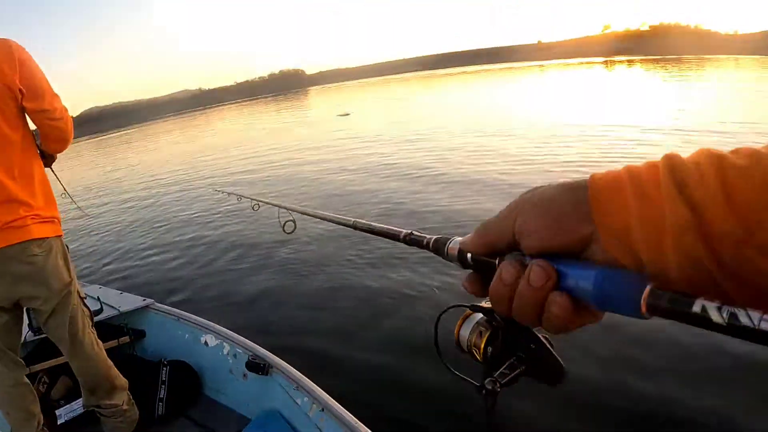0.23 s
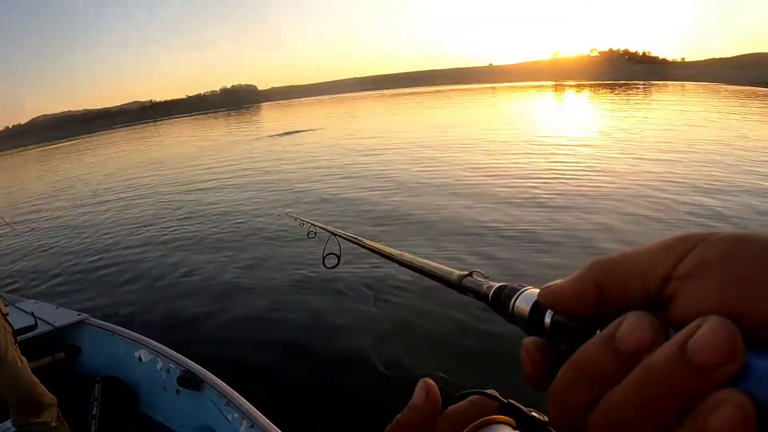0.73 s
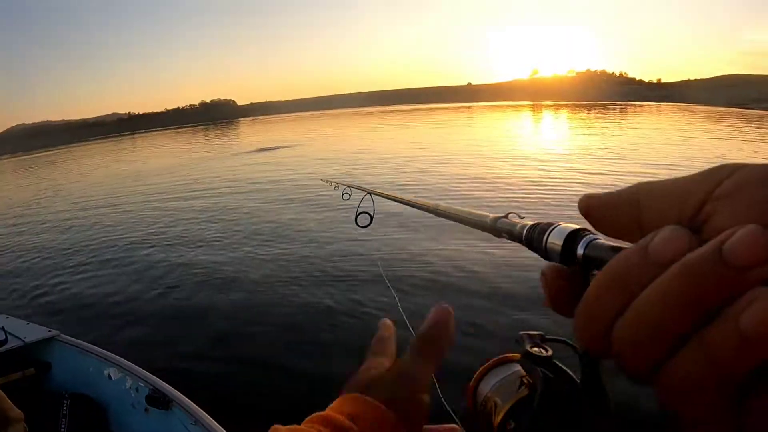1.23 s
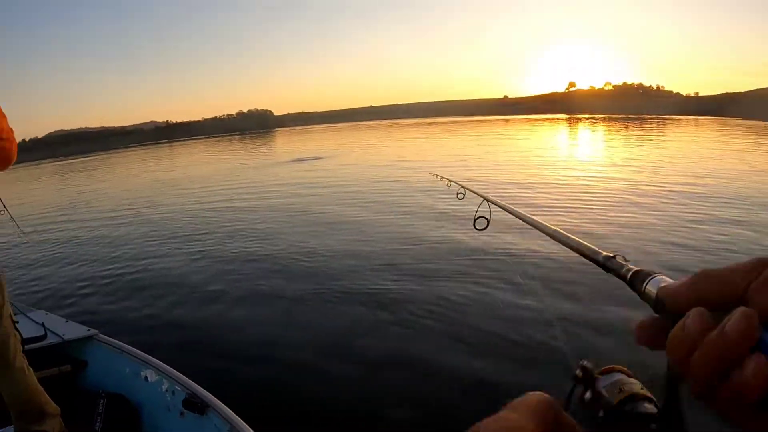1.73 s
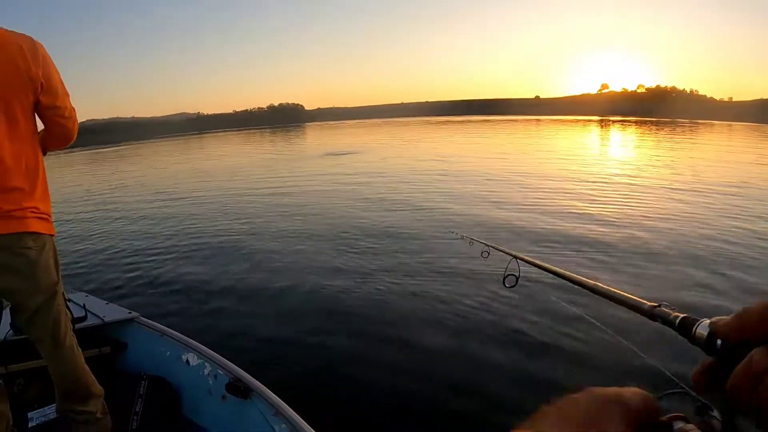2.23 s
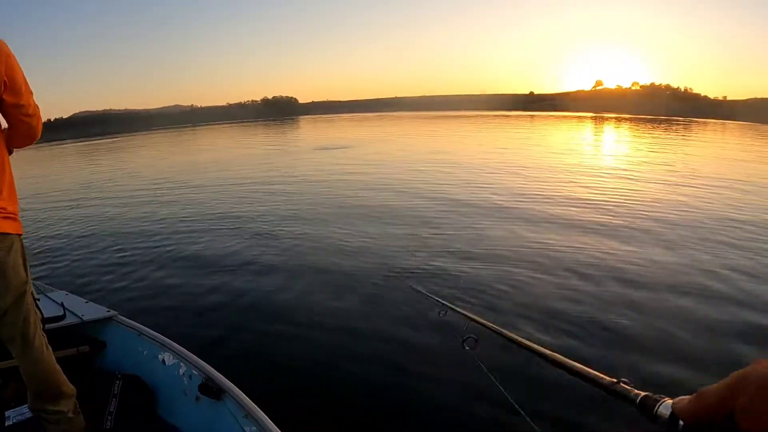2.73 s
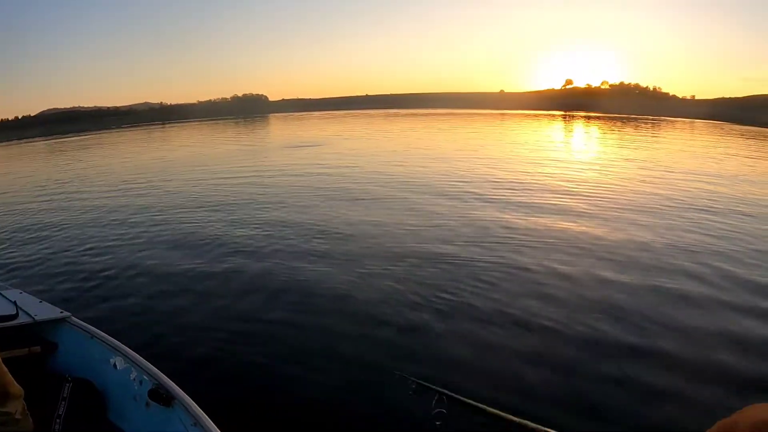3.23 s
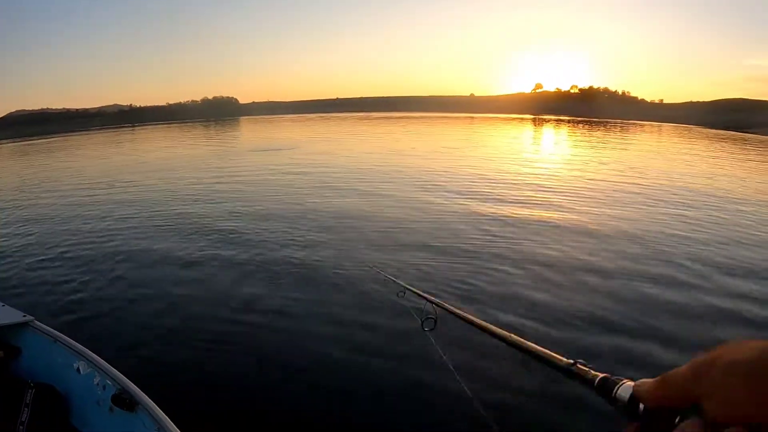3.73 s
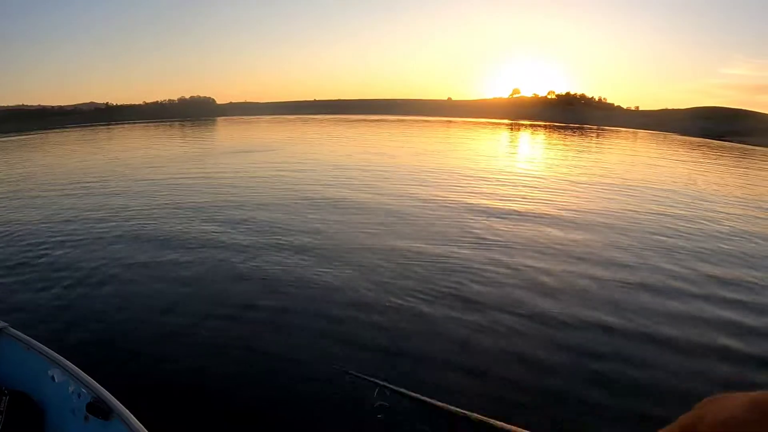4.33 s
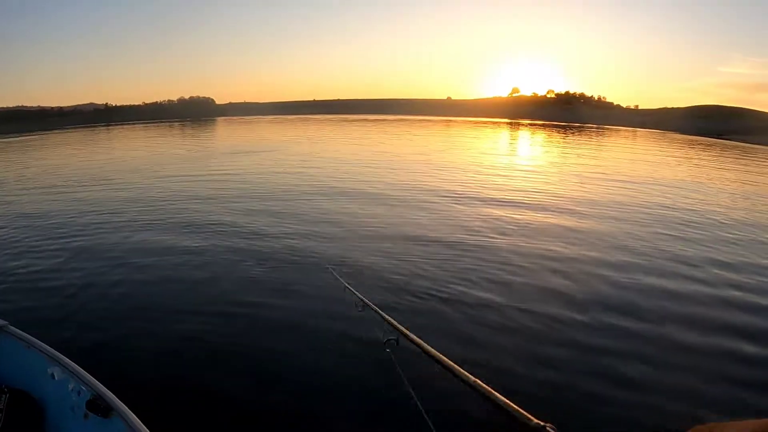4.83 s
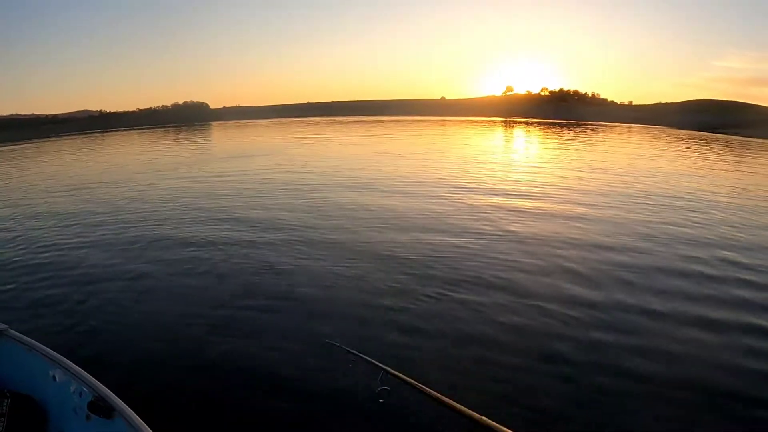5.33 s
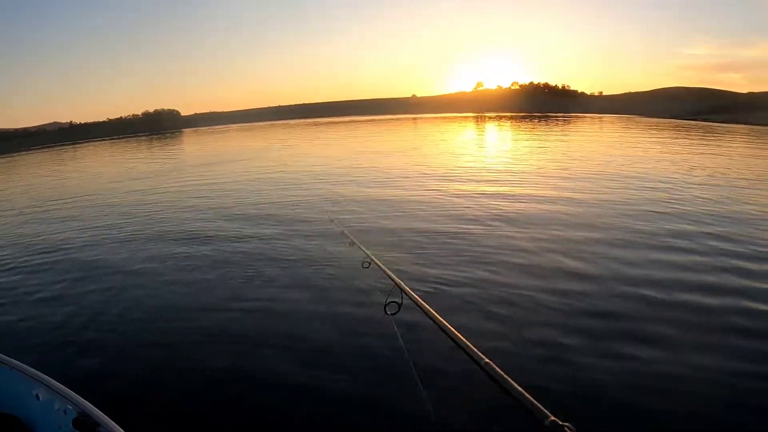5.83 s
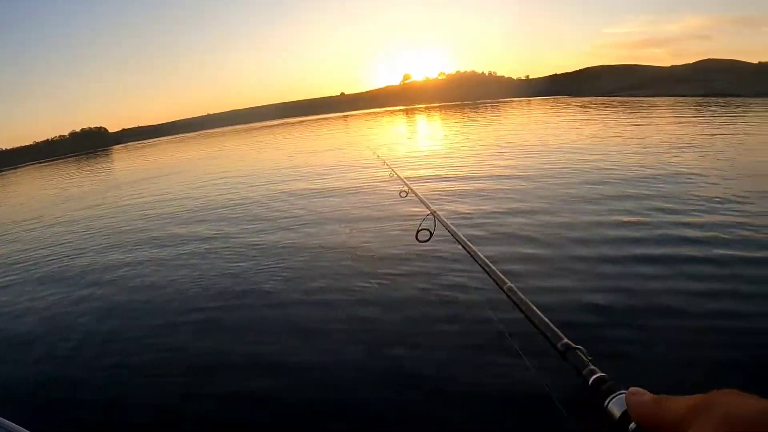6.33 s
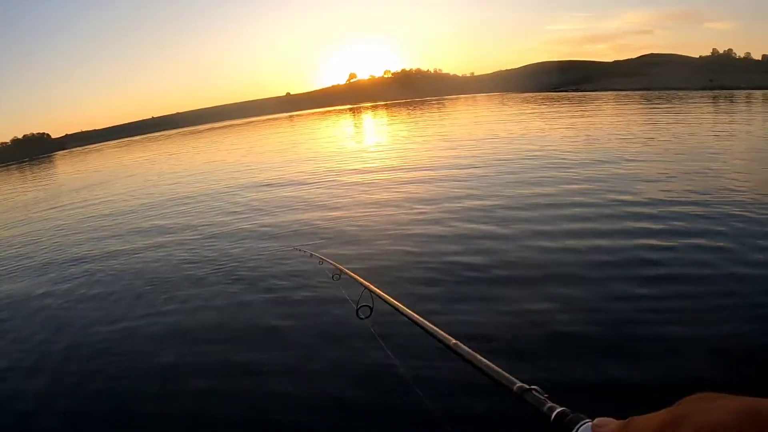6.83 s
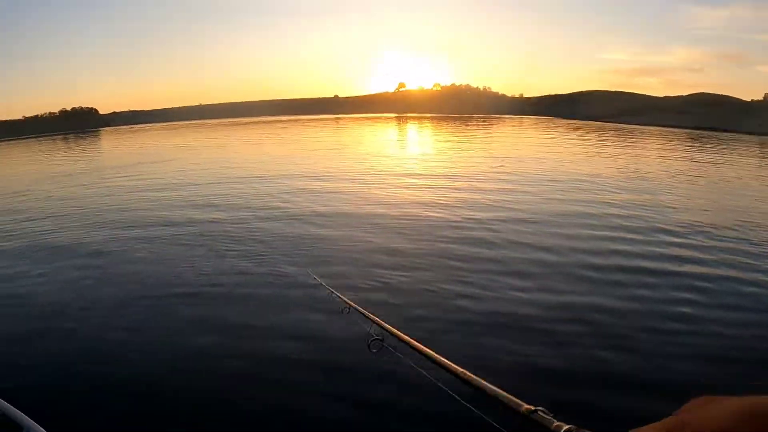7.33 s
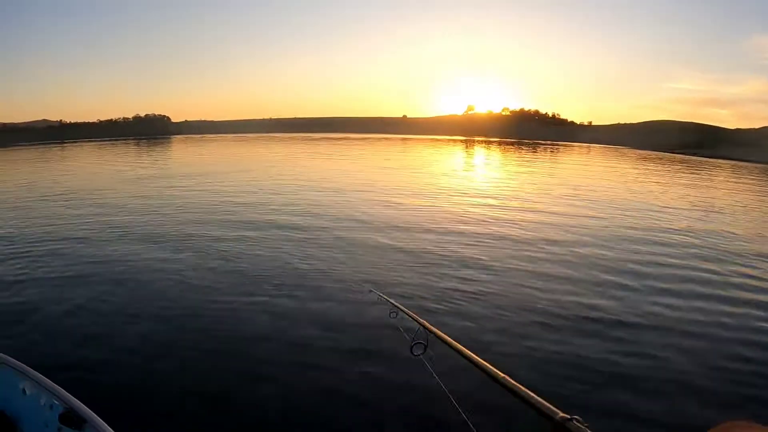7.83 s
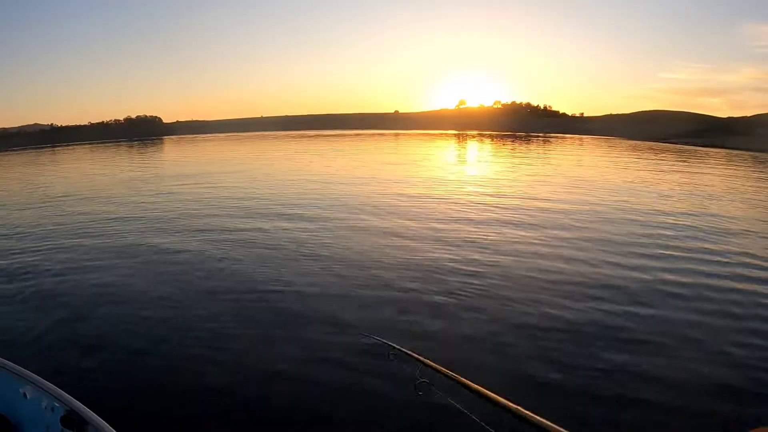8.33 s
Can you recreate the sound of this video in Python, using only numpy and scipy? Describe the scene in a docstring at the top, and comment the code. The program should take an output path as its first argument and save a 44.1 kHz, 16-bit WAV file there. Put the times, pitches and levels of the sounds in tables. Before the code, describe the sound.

Quiet open air on a lake, heard from a microphone on an angler's chest in a small metal boat. From 0 to 1.1 s a sleeve rustles, gear knocks softly, and line runs off a spinning reel with a fluttering hiss and thin high singing, swelling around 0.7 to 0.95 s. At 1.15 s the bail slams shut, a tight cluster of loud, bright metallic cracks with a brief ring. From about 1.5 s the reel is wound in uneven fits: faint gear whirr, line rubbing, crackles and sharp ticks. A low hollow hull thump hits at 2.4 s with rattling knocks. Water gulps softly at times, mostly from 3.6 to 4.8 s. Ticks crowd together at 4.8 to 5 s, then thin out. Deep soft bumps come from 5.9 to 7.1 s, another click cluster around 7.2 to 7.5 s, and a faint grip squeak with small knocks at 8.5 s.

```python
"""An angler in a small metal boat on a calm lake, with a camera on the chest.
From the start, still air, a rustling sleeve and soft knocks; line hisses and sings off a spinning reel.
At 1.15 s the bail snaps shut: hard cracks with the ring of the reel. Water gulps softly under the hull.
From 1.47 s the reel is wound in fits: gears ring resonances, line ticks, rubs and crackles as grains of noise.
Blows ring the hull's low modes, the strongest at 2.4 s; near the end the grip squeaks, a narrow noise band."""
import sys
import numpy as np
from scipy import signal
from scipy.fft import rfft, irfft, next_fast_len
from scipy.io import wavfile
from scipy.ndimage import uniform_filter1d

SR = 44100
rng = np.random.default_rng(int(sys.argv[2]) if len(sys.argv) > 2 else 0)


def inscribe(sig):
    """Save sig as 16-bit PCM at rate SR to the path in sys.argv[1].

    A 1-D sig is mono; a 2-D sig holds one channel per row.
    Samples are clipped to [-1, 1] before scaling.
    """
    pcm = np.round(np.clip(np.atleast_2d(sig).T, -1, 1) * 32767)
    wavfile.write(sys.argv[1], SR, pcm.astype(np.int16))


N = 378378
TIME = np.arange(N) / SR
HIT = np.arange(SR // 2) / SR  # half a second, for one blow
LEFT_RIGHT = np.array([[1], [-1]])


def undb(db):
    """Decibels to gain."""
    return 10 ** (np.asarray(db) / 20)


def unit(x):
    """Scale to rms 1."""
    return x / np.sqrt(np.mean(x ** 2))


def peak(x, db):
    """Scale to a peak level."""
    return x * undb(db) / np.abs(x).max()


def level(x, db, window_s):
    """Scale to the rms level of the loudest moment."""
    power = uniform_filter1d(np.mean(np.atleast_2d(x) ** 2, axis=0), max(int(window_s * SR), 1))
    return x * undb(db) / np.sqrt(power.max())


def fade(t60):
    """Exponential decay of one blow."""
    return np.exp(-np.log(1000) * HIT / max(t60, 1e-4))


def arch(start, length):
    """A smooth swell from silence and back."""
    return np.sin(np.pi * np.clip((TIME - start) / length, 0, 1))


def curve(table, column=1):
    """Gain over time from a dB column, dying away quickly outside its span."""
    rows = np.array(table)
    outside_s = np.maximum(rows[0, 0] - TIME, 0) + np.maximum(TIME - rows[-1, 0], 0)
    return undb(np.interp(TIME, rows[:, 0], rows[:, column])) * np.exp(-outside_s / 0.043)


def colour(x, points):
    """Causal minimum-phase filter with a (Hz, dB) response, built by folding the cepstrum."""
    size = next_fast_len(x.shape[-1] + 2048) // 2 * 2
    hz, db = np.transpose(points)
    bins_hz = np.maximum(np.arange(size // 2 + 1) * SR / size, 1)
    gain = undb(np.interp(np.log(bins_hz), np.log(hz), db))
    cepstrum = irfft(np.log(gain))
    cepstrum[1:size // 2] *= 2
    cepstrum[size // 2 + 1:] = 0
    return irfft(rfft(x, size) * np.exp(rfft(cepstrum)))[..., :x.shape[-1]]


def ring(x, hz, width):
    """One resonance, gain 1 at its centre."""
    hz = min(hz, SR * .45)
    g, k = np.tan(np.pi * hz / SR), width / hz
    numerator = [g * k, 0, -g * k]
    denominator = [1 + g * k + g * g, 2 * g * g - 2, 1 - g * k + g * g]
    return signal.lfilter(numerator, denominator, x + 1e-18)


def noise(side_db, size=N):
    """Stereo noise: a shared part and a part of opposite sign at the two ports."""
    mid, side = rng.standard_normal((2, size))
    return mid + undb(side_db) * side * LEFT_RIGHT


def walk(rate):
    """Random levels held 1 / rate s and slewed; spread near 1."""
    k = max(int(SR / rate), 2)
    steps = np.repeat(rng.standard_normal(N // k + 1), k)
    return unit(uniform_filter1d(steps, k)[:N])


def narrow(hz, width):
    """A band of noise whose centre follows a pitch curve; rms 1."""
    lowpass = signal.butter(2, width / 2, fs=SR, output="sos")
    churn = signal.sosfilt(lowpass, rng.standard_normal((2, len(hz))))
    phase = 2 * np.pi * np.cumsum(hz) / SR
    return unit(churn[0] * np.cos(phase) + churn[1] * np.sin(phase))


def scatter(t60):
    """One hard contact spreading through a small body: a dense, dying burst with a fairly even spectrum."""
    spectrum = rfft(rng.standard_normal(len(HIT)) * fade(t60))
    return irfft(spectrum / (np.abs(spectrum) + 1e-12), len(HIT)) * fade(t60 * 2)


def grains(rate, spread_db, side_db):
    """A crowd of tiny contacts at random moments, most weak and a few strong; rms 1."""
    sizes = undb(spread_db * np.minimum(rng.exponential(size=N), 4))
    return unit((rng.random(N) < rate / SR) * sizes * noise(side_db))


def add(track, s, sound):
    """Mix a sound in at a time."""
    i = int(s * SR)
    track[..., i:i + sound.shape[-1]] += sound[..., :N - i]


# Still air over the lake. Each row: frequency in Hz, relative density in dB per Hz.
AIR_COLOUR = [(25, -6.5), (90, -3.5), (160, 6.5), (300, 1), (500, -5.5), (900, -13), (1300, -8),
              (2200, -18), (4000, -28), (7700, -21), (8700, -38), (12300, -38), (13800, -53),
              (16000, -62.5)]
AIR_DB = -57.5
# The camera sways on the chest. Each row: time in seconds, relative level in dB.
SWAY_LEVELS = [(0, -69), (.45, -52), (.65, -52.5), (.9, -59), (1.3, -62), (2.3, -59), (2.5, -36.5),
               (2.75, -49.5), (3.2, -60), (4.6, -56.5), (4.85, -74), (5.2, -51.5), (6.2, -52.5), (7.2, -48),
               (7.32, -72), (7.85, -58), (8.0, -61), (8.58, -57)]


def background(sway_db=-4, sway_hz=34, sway_width_hz=55, lurch_db=3):
    """Quiet open air, and the low rumble of the camera swaying and lurching."""
    air = undb(AIR_DB) * unit(colour(noise(side_db=-11.0), AIR_COLOUR)) * undb(0.14 * walk(1.97))
    sway = ring(noise(side_db=-16.5), sway_hz, sway_width_hz)
    sway = ring(sway, sway_hz, sway_width_hz)
    return air + undb(sway_db) * unit(sway) * curve(SWAY_LEVELS) * undb(lurch_db * walk(12))


# Line running off the spool. Each row: time in seconds, relative level in dB,
# coils brushing the lip in dB relative to that.
CAST_RUN = [(0.0, -42.5, -25), (0.04, -45.5, -12.5), (0.326, -48.5, -14.5), (0.346, -50, -9.5),
            (0.598, -49.5, -4.5), (0.648, -48.5, -8), (0.7, -41.5, -15), (0.76, -42, -15), (0.94, -44, -14),
            (0.98, -48, -7), (1.016, -48.5, -14), (1.05, -51.5, -15), (1.11, -49, -26)]
# The hand round the spool colours the hiss. Each row: frequency in Hz, relative density in dB per Hz.
CAST_HISS_COLOUR = [(70, -8), (170, 3), (450, -1), (900, -7.5), (1400, -6), (1950, -6.5), (3000, -8.5),
                    (4800, -12), (7600, -15.5), (8600, -19.5), (14000, -30)]
# Its resonances. Each row: frequency in Hz, width in Hz, relative level in dB.
CAST_RESONANCES = [(988, 53, -1), (1185, 45, -6), (2703, 48, 1), (2783, 40, -4), (3150, 36, -3),
                   (3870, 53, -6.5), (4500, 90, -20)]
# Brushing of the coils. Each row: frequency in Hz, relative density in dB per Hz.
COIL_BRUSH_COLOUR = [(3000, -36), (7000, 3), (9000, -2), (10300, 3.5), (11200, 7.5), (12300, 8), (13200, 2),
                     (16000, -22)]
# The spool's lip sings, starting sharp by the drop and settling.
SING_HZ, SING_DROP_HZ, SING_SETTLE_S = 2780, 227.4, 0.11
RING_COUPLING = .8  # exponent: ringing against strength of the run


def cast(modes_db=-3.0, flutter_db=1.5, shift_db=3.5, level_db=-2, brush_db=3, sing_db=-14,
         sing_width_hz=34):
    """Coils whip off: a fluttering hiss, ringing more the harder it runs, a settling note, fine brushing."""
    run = curve(CAST_RUN)
    rush = noise(side_db=-10.5) * undb(flutter_db * walk(70.6))
    rings = sum(undb(db + shift_db * walk(24.3)) * ring(rush, hz, width)
                for hz, width, db in CAST_RESONANCES)
    note = narrow(SING_HZ + SING_DROP_HZ * np.exp(-TIME / SING_SETTLE_S), sing_width_hz)
    ringing = undb(modes_db) * unit(rings) + undb(sing_db) * note
    body = unit(colour(rush, CAST_HISS_COLOUR)) + ringing * (run / run.max()) ** RING_COUPLING
    brush = unit(colour(noise(side_db=-6.0), COIL_BRUSH_COLOUR)) * curve(CAST_RUN, column=2)
    return undb(level_db) * (body + undb(brush_db) * brush) * run


# Colour of the sleeve. Each row: frequency in Hz, relative level in dB.
CLOTH_COLOUR = [(70, -17), (160, 0.5), (280, 1), (500, -0.5), (660, 1), (800, -3.5), (970, 0), (1500, -8.5),
                (2500, -11), (4000, -36), (9000, -55)]
# The arm swings the rod down after the cast. Each row: time in seconds, relative level in dB.
ARM_SWING = [(0, -47), (.05, -63), (.12, -53), (.18, -56), (.24, -49), (.36, -50), (.5, -52), (.75, -51),
             (1.05, -59.5)]


def sleeve(level_db=1.5, catch_db=2.5, fold_db=1.5, snag_rate=180, snag_db=0):
    """Cloth drags, snags many times a second, and swells as folds pass."""
    drag = noise(side_db=-9) * undb(catch_db * walk(110))
    snags = undb(snag_db) * grains(snag_rate, spread_db=2, side_db=-4.5)
    cloth = colour((drag + snags) * undb(fold_db * walk(9)), CLOTH_COLOUR)
    return undb(level_db) * unit(cloth) * (curve(ARM_SWING) + winding(CLOTH))


# Loose gear and elbow knocks. Each row: start in seconds, relative level in dB, brightness in Hz,
# rattle t60 in seconds.
GEAR_KNOCKS = [(0.036, -43, 220, 0.067), (0.2, -44, 600, 0.26), (0.245, -45, 520, 0.23),
               (1.164, -38.5, 400, 0.13), (1.243, -50, 1700, .15), (1.348, -56, 2500, .02),
               (1.403, -48, 279, .04), (1.4831, -39.5, 1070, 0.043), (1.533, -47.5, 600, .05),
               (1.783, -45, 300, .07), (2.389, -43, 210, 0.045), (2.4422, -40, 553.5, 0.091),
               (2.464, -43, 519, 0.076), (2.477, -39.5, 480, 0.2), (2.508, -46.5, 900, .06),
               (2.548, -45, 404, 0.15), (2.628, -43, 440, 0.18), (2.689, -43, 720, 0.12),
               (3.092, -44, 380, 0.043), (3.341, -45, 1310, 0.029), (3.9955, -48.5, 1909, .012),
               (4.822, -44, 1700, 0.03), (4.872, -49, 1300, 0.016), (4.997, -42.5, 1000, 0.012),
               (5.545, -44, 600, 0.13), (5.583, -45, 260, 0.038), (5.696, -46.5, 1300, .02),
               (6.783, -44.5, 680, 0.07), (6.88, -51, 1600, 0.023), (6.887, -46, 1110, 0.095),
               (7.075, -49, 500, 0.077), (7.27, -52, 350.6, 0.043), (7.308, -58, 1410, 0.024),
               (7.337, -50, 380, 0.048), (7.44, -49.5, 450, .06), (7.939, -46.5, 1000, 0.064),
               (8.175, -45, 800, 0.055), (8.181, -43, 506, 0.13), (8.413, -44, 595, 0.13),
               (8.4452, -44, 1510, 0.053), (8.452, -43, 800, 0.051), (8.525, -44, 1100, 0.05),
               (8.538, -44.5, 450, 0.25)]
# Colour of the knocks. Each row: frequency in Hz, relative level in dB.
KNOCK_TONE = [(60, -31), (150, 13.5), (320, 8.5), (500, 7.5), (800, 3), (1000, -0.5), (1500, 2.5),
              (2500, 0.5), (7500, 0), (10000, -24), (16000, -37)]
# Modes of the hollow hull that every knock rings. Each row: frequency in Hz, t60 in seconds, relative dB.
HOLLOW_MODES = [(161, 0.124, 4), (238, 0.062, -3), (300, 0.087, 0.5), (400, 0.16, -4), (479, 0.11, -2.5),
                (660, 0.098, 0), (930, 0.07, 3), (1010, 0.091, 7), (1555, .04, -6)]


def knocks(breadth=0.85, rattle_rate=350, rattle_db=-6, scuff_db=-25, hollow_db=-4):
    """A blow, then a dying rattle and scuff as the thing settles; all of it rings the hollow hull."""
    out = np.zeros((2, N))
    strike = signal.unit_impulse(len(HIT))
    hollow = sum(undb(db) * ring(strike, hz, np.log(1000) / np.pi / t60) for hz, t60, db in HOLLOW_MODES)
    for s, db, hz, t60 in GEAR_KNOCKS:
        contacts = undb(rattle_db) * (rng.random(len(HIT)) < rattle_rate / SR) + undb(scuff_db)
        blow = strike + contacts * noise(side_db=-12, size=len(HIT)) * fade(t60)
        blow = colour(ring(blow, hz, hz * breadth), KNOCK_TONE)
        boom = signal.fftconvolve(blow, hollow[None], axes=1)[:, :len(HIT)]
        add(out, s, level(unit(blow) + undb(hollow_db) * unit(boom), db, window_s=.005))
    return out


# Soft blows on the hull and the camera's harness. Each row: start in seconds, peak in dB before panning,
# middle pitch in Hz, rise in seconds, t60 in seconds, left minus right in dB.
HULL_BLOWS = [(0.644, -43, 45, 0.01, 0.11, 2), (1.163, -29.5, 172, 0.0012, 0.021, -2),
              (1.175, -42.5, 60, 0.011, 0.16, 2), (1.481, -41.5, 73.6, 0.0049, 0.14, 1),
              (1.757, -39.5, 73.6, 0.0053, 0.31, 1), (2.384, -21, 121.6, 0.0099, 0.071, 0.5),
              (2.414, -29.5, 94.4, 0.0061, 0.13, 0.5), (2.443, -36, 288, 0.001, 0.04, 1),
              (2.449, -33.5, 273, 0.001, 0.031, -1), (2.457, -29, 143, 0.0047, 0.064, 1),
              (2.467, -43, 215, 0.0012, 0.03, -1), (2.499, -41, 280, 0.003, 0.09, 1),
              (2.515, -33, 42, 0.014, 0.16, -5), (2.568, -39.5, 70, 0.0088, 0.15, 1),
              (2.598, -41, 104, 0.0087, 0.11, -1), (2.628, -41, 51.6, 0.009, 0.1, 3),
              (2.91, -42.5, 48.6, 0.015, 0.35, 2), (3.335, -50, 45.3, 0.016, 0.2, 8),
              (3.654, -48, 39, 0.021, 0.36, 2), (5.45, -48.5, 66, 0.014, 0.14, 0),
              (5.889, -42.5, 35.5, 0.0098, 0.1, 1), (6.148, -30.5, 32, 0.0065, 0.36, -5),
              (6.414, -37, 42.3, 0.011, 0.24, -8), (6.758, -37, 30.46, 0.0077, 0.2, -6),
              (6.883, -36.5, 32.56, 0.011, 0.17, -6), (6.975, -41, 35, 0.011, 0.13, -9),
              (7.069, -41, 51, 0.013, 0.12, -4), (7.991, -46, 52, .012, 0.15, 1),
              (8.531, -39.5, 161, 0.003, 0.19, 1)]
# Modes of a hull panel. Each row: multiple of the lowest pitch, relative level in dB.
PANEL_MODES = [(1, 2), (2.3, -17), (3.25, -20.5)]


def hull(sag=0.2, sag_s=0.032):
    """Soft pushes swell and ring a panel's low modes; the pitch sags as the contact relaxes."""
    out = np.zeros((2, N))
    for s, db, hz, rise_s, t60, pan_db in HULL_BLOWS:
        bend = 1 + sag * (2 * np.exp(-HIT / sag_s) - 1)
        phase = 2 * np.pi * np.cumsum(hz * bend) / SR
        modes = sum(undb(mode_db) * np.sin(multiple * phase) for multiple, mode_db in PANEL_MODES)
        swell = 1 - np.exp(-(HIT / rise_s) ** 2)
        add(out, s, peak(modes * swell * fade(t60), db) * undb(pan_db / 2 * LEFT_RIGHT))
    return out


# The louder line and reel ticks. Each row: time in seconds, relative peak in dB, pitch in Hz,
# sharpness Q of the first pass, knock of the reel body in relative dB, fine edge in relative dB.
LINE_TICKS = [(1.1187, -29, 4320, 0.87, -32, -29), (1.486, -39, 1630, 0.73, -31, -31),
              (1.488, -34.5, 1650, 0.7, -32, -34), (1.4908, -33, 5170, 1.6, -1, -15),
              (1.6158, -31.5, 5710, 0.66, -32, -36), (1.6427, -35, 3480, 2.1, -29, -36),
              (1.6612, -25.5, 4140, 0.88, -32, -12), (1.7432, -32, 3930, 2.3, -32, -9),
              (1.8052, -27, 4500, 1, -17, -20), (1.833, -27, 3590, 0.86, -31, -31),
              (1.8604, -26, 7340, 2.2, -3, -31), (1.863, -28, 4940, 0.8, -32, -36),
              (1.8817, -27, 4130, 2.8, 6, 4), (1.9203, -39, 2640, 8.2, -32, -36),
              (1.961, -24, 4860, 1.6, -14, -36), (1.9863, -16, 6760, 1.0, 4.5, -3),
              (1.99, -25, 5440, 1.0, -32, -36), (1.9963, -17, 4000, 4.7, -7, -11),
              (2.0188, -30, 4620, 4.8, -19, -36), (2.0293, -24.5, 4360, 3.7, -32, -27),
              (2.0396, -32, 4010, 1.0, -32, -36), (2.067, -25, 6820, 1.4, -31, -36),
              (2.072, -31.5, 4300, 5.0, -20, -35), (2.0946, -38, 4790, 6.3, -32, -36),
              (2.1212, -24, 3510, 1.9, -32, -9), (2.1251, -25.5, 6140, 2, -32, -36),
              (2.1288, -32, 4250, 1.0, -32, -28), (2.1316, -30, 2400, 6.8, -8, -36),
              (2.24, -35, 3900, 4.9, -8, -21), (2.2864, -32.5, 5800, 1.3, -32, -36),
              (2.364, -34.5, 2480, 7.2, -16, -15), (2.4154, -26, 6140, 0.72, -32, -36),
              (2.4476, -28, 4230, 1.0, -2, -36), (2.4572, -21, 7760, 4.1, -32, -36),
              (2.4672, -29, 7780, 4.3, -32, -11), (2.4698, -21.5, 8320, 1.7, -13, -36),
              (2.4802, -39, 2680, 2.6, -31, -28), (2.5013, -26.5, 5090, 0.85, 3, -33),
              (2.5169, -29, 7070, 1.7, -5, -32), (2.555, -34, 4960, 2.7, 7, -26),
              (2.5661, -21.5, 4800, 0.87, -32, -27), (2.5825, -24.5, 8600, 1.3, -3.5, -2),
              (2.6747, -34, 8220, 2.8, -14, -14), (2.6805, -27.5, 6300, 1.2, -5, 0),
              (2.7129, -34, 2640, 2.3, -30, -13), (2.718, -36, 1940, 2.0, -32, -33),
              (2.7365, -39, 2320, 4.9, 4, -16), (2.7587, -34.5, 4170, 1.0, 4, -36),
              (2.7643, -34, 4950, 3.1, -32, -36), (2.9234, -25, 8440, 1.4, -16, -32),
              (3.004, -24, 8650, 2.9, -6.5, -25), (3.0432, -23.5, 7350, 0.68, -32, -6),
              (3.0605, -34, 7350, 6, -32, -24), (3.104, -33, 5480, 1.4, -5, -22),
              (3.132, -25, 8800, 3, -26, -11), (3.1489, -32.5, 7590, 3.1, -13, -17),
              (3.224, -29, 3430, 8.2, 3, -36), (3.2454, -26.5, 3300, 5.7, -9, -36),
              (3.265, -24.5, 7520, 1.8, 5, -34), (3.2957, -42, 2300, 5.3, -32, -36),
              (3.3436, -44, 1640, 2.4, -32, -36), (3.4256, -31, 3450, 8.2, -1, -36),
              (3.4715, -37, 7830, 3.2, 4, -36), (3.5226, -35, 3420, 3.4, -32, -16),
              (3.537, -34, 3096, 8.2, -6, -12), (3.552, -29.5, 3076, 1.7, -32, -36),
              (3.5978, -16, 6330, 0.95, -17, -36), (3.6409, -31, 7000, 3.9, 2, -36),
              (3.6644, -23, 3240, 5.7, -23, -28), (3.841, -33, 7540, 4.1, 7, -34),
              (3.8802, -32, 3090, 3.9, -32, -20), (3.8937, -27, 2930, 4.3, -16, -18),
              (3.9619, -14.5, 6340, 2.1, -32, -10), (4.0616, -26, 3060, 5.7, -5, -34),
              (4.09, -30, 7330, 1.7, -20, -32), (4.1531, -27.5, 7250, 4.9, 7, -36),
              (4.2453, -33, 4670, 0.72, 4, -36), (4.2662, -31.5, 3060, 3.3, -32, -36),
              (4.275, -39, 5660, 6.1, -12, -36), (4.3209, -17, 6530, 2.6, -24, -36),
              (4.3813, -25.5, 3220, 4.5, -32, -34), (4.4971, -27.5, 2920, 2.6, -32, -17),
              (4.5383, -35, 3630, 1.5, -4, -36), (4.6642, -23.5, 3380, 6.9, -19, -34),
              (4.6865, -26, 3600, 7.3, 0, -10), (4.7404, -27, 5440, 1.1, -9, -14),
              (4.7655, -30, 4700, 6.1, -17, -8), (4.7702, -35, 5270, 3.8, 0, -36),
              (4.7759, -28, 4350, 1.3, -32, -33), (4.7883, -17, 5860, 6.6, 10, -27),
              (4.791, -28, 4250, 1.2, -9, 1), (4.8008, -22, 7480, 1.2, -26, -5),
              (4.8097, -25, 5200, 2.5, 1, -16), (4.8271, -28, 5500, 1.16, 4, -13),
              (4.831, -30, 3710, 3.9, 5, -36), (4.8339, -30, 5490, 7.0, -9, -26),
              (4.839, -25, 5370, 1.0, -9, -1), (4.8416, -32, 4220, 1.0, -32, -36),
              (4.8708, -25, 3490, 1.7, -32, -2), (4.8732, -19, 5100, 1.6, -12, -36),
              (4.8951, -25, 5630, 3.1, -23, -36), (4.9001, -22, 5100, 1.3, -32, -33),
              (4.9098, -11, 4200, 1.3, -34, -36), (4.9251, -38, 3380, 8.2, -32, -36),
              (4.9292, -24, 4575, 3.3, -23, -23), (4.931, -11, 5010, 0.71, -34, -36),
              (4.9348, -37, 5430, 5.2, -21, -19), (4.9503, -23, 3400, 4.1, -29, -12),
              (4.9603, -18.5, 4240, 1.7, -8, -36), (5.0125, -17.5, 5800, 2.9, -30, -27),
              (5.038, -25.5, 6040, 0.98, -6, -36), (5.1012, -26.5, 5630, 1.0, -32, -36),
              (5.1037, -38, 3870, 0.78, -5, -36), (5.1199, -37, 6840, 2.7, -11, -38),
              (5.3618, -23, 6240, 10.5, -27, -36), (5.384, -33, 6580, 3.9, -11, -36),
              (5.6619, -31, 5160, 2.6, -25, -16), (5.6972, -47, 1650, 1.2, -30, -38),
              (5.825, -33.5, 5260, 7.0, -16, -31), (6.302, -30.5, 5340, 4.4, -25, -38),
              (6.409, -30.5, 5760, 4.1, -32, -26), (6.593, -30, 5100, 4.3, -32, -31),
              (6.824, -36.5, 4900, 3.5, -32, -24), (6.8862, -40, 1640, 1.3, -31, -30),
              (7.1411, -31.5, 5650, 2.7, -13, -25), (7.1493, -32, 6750, 8.0, -10, -36),
              (7.19, -30.5, 7300, 7.6, -32, -36), (7.2147, -22.5, 5670, 1.1, -11, -17),
              (7.2244, -26, 6030, 1.5, -12, -21), (7.2694, -20, 6670, 1.0, -32, -18),
              (7.2744, -20.5, 8140, 3.5, -32, -4), (7.3085, -24.5, 3920, 2.8, -4, -30),
              (7.313, -30, 4840, 1, 0, -34), (7.33, -35, 2000, 8.2, -2, -36),
              (7.3597, -25.5, 8160, 2.1, -11, 2), (7.4408, -31.5, 4750, 4.2, -5, -25),
              (7.4638, -24, 5540, 0.58, 6, -36), (7.5031, -37, 5420, 7.4, -16, -35),
              (7.5067, -29, 4710, 2.6, -12, -34), (7.6781, -32, 7170, 4, -20, -36),
              (7.9792, -37, 5520, 3.8, -18, -12), (7.9858, -31, 4840, 1.9, -32, -21),
              (7.9923, -19.5, 5500, 1.6, -37, -20), (7.9976, -34, 5580, 1.1, -32, -19),
              (8.0987, -30, 4210, 0.71, -32, -38), (8.1114, -34, 3980, 0.81, -32, -20),
              (8.2867, -36.5, 1640, 1.3, -34, -36), (8.4456, -34, 3740, 4.3, -15, -41),
              (8.527, -34, 3610, 9.1, -7, -30)]
# Modes of the reel, also rung by the bail. Each row: frequency in Hz, t60 in seconds, relative level in dB.
REEL_MODES = [(1020, .05, -5), (1197, .25, -8.5), (1700, 0.043, 1.5), (1975, 0.069, 1.5),
              (2020, 0.057, 2.5), (2250, .05, -10.5), (2730, 0.076, -8), (3680, .055, 4), (4440, 0.06, 0.5),
              (5030, .05, 0), (5460, 0.034, -15), (5950, 0.037, -4), (7700, 0.034, 3), (12000, .025, -13)]
# Sharp sounds at the camera's port, also for the crackle. Each row: frequency in Hz, relative level in dB.
PORT_COLOUR = [(200, -8), (1000, 3), (2000, 3), (3200, 1), (3850, -3), (4600, -1.5), (7500, 1), (8400, -3),
               (10500, -0.5), (12000, -2.5), (13500, -6), (16000, -16)]


def slip_answer(push, parts, breadth):
    """A slip drives damped resonances, each of a narrow and a broader pass."""
    return sum(undb(db) * ring(ring(push, hz, width), hz, hz * breadth) for hz, width, db in parts)


def ticks(level_db=-1.5, rebound_db=-5, rebound_s=.0005, breadth=2.25, scrape_db=-17, scrape_cycles=16,
          lead_noise_db=-27, lead_noise_s=0.0013, ring_db=-31, chatter_db=-14, chatter_rate=140,
          chatter_s=0.0061, body_hz=2400, body_width_hz=1500, edge_hz=11000, edge_width_hz=5000):
    """Line slips over roller and spool, rebounds and scrapes among lesser slips; the reel rings."""
    out, size, lead = np.zeros((2, N)), 2048, 384  # samples; lead precedes the main slip
    reel = sum(undb(db) * fade(t60) * np.sin(2 * np.pi * hz * HIT) for hz, t60, db in REEL_MODES)[:size]
    near = np.exp(-np.abs(HIT[:size] - HIT[lead]) / chatter_s)
    # faint noise rises before each tick
    lead_noise = undb(lead_noise_db) * np.exp(-HIT[:lead] / lead_noise_s)[::-1]
    strike = signal.unit_impulse(size, lead)
    for s, db, hz, sharpness, body_db, edge_db in LINE_TICKS:
        parts = [(hz, hz / max(sharpness, .5), 0),
                 (body_hz, body_width_hz, body_db),
                 (edge_hz, edge_width_hz, edge_db)]
        scrape = undb(scrape_db) * fade(scrape_cycles / hz)[:size - lead]
        rustle = noise(side_db=-2.5, size=size) * np.concatenate([lead_noise, scrape])
        slips = undb(chatter_db) * (rng.random(size) < chatter_rate / SR) * near
        rebound = undb(rebound_db) * np.roll(strike, int(SR * rebound_s * rng.uniform(.4, 1)))
        push = strike + rebound + slips + rustle
        strike_peak = np.abs(slip_answer(strike, parts, breadth)).max()
        add(out, s - lead / SR, slip_answer(push, parts, breadth) * undb(db + level_db) / strike_peak)
        add(out, s, peak(reel, db + ring_db))
    return colour(out, PORT_COLOUR)


# The bail trips, slams home and rebounds. Each row: time in seconds, relative level in dB, bass in relative
# dB, middle in relative dB, crack t60 before its spectrum is evened in seconds, ring of the reel in relative dB.
BAIL_IMPACTS = [(1.1459, -15, -16.5, -14.5, 0.015, -20), (1.1599, -13.5, 0.5, 6, 0.013, -14.5),
                (1.1613, -18, -3.5, 3, 0.014, -25), (1.163, -16.5, 1.5, 6, .009, -18),
                (1.1662, -29.5, 2, 2, .024, -19.5), (1.1811, -26, -5.5, -2.5, 0.039, -18),
                (1.1826, -25, -0.5, 5, 0.016, -14.5), (1.188, -30, 2.5, 0, .045, -18)]
# Colour of the crack. Each row: frequency in Hz, relative level in dB.
CRACK_COLOUR = [(200, -5.5), (700, -3.5), (1400, 0.5), (2000, 4.5), (2700, 1), (3100, -7), (3600, 0.5),
                (5500, -1.5), (7600, -1), (8500, -12.5), (10500, -17), (11900, -7.5), (13500, -22),
                (16000, -43)]
# Faint ring of the metal hull. Each row: frequency in Hz, relative level in dB.
HULL_RING_COLOUR = [(150, -6), (400, 5), (1200, 1), (2600, -3), (3300, -1), (6500, -23), (9000, -10),
                    (16000, -24)]


def bail(side_db=-12.5, hull_db=-29, hull_t60=0.56):
    """The sprung wire hits: a hard crack, with its own bass and middle for each impact; reel and hull ring."""
    out = np.zeros((2, N))
    for s, db, bass_db, middle_db, t60, ring_db in BAIL_IMPACTS:
        burst = scatter(t60) + undb(side_db) * scatter(t60) * LEFT_RIGHT
        balance = [(900, bass_db), (1800, middle_db), (2700, middle_db), (5000, 0)]
        crack = colour(colour(burst, CRACK_COLOUR), balance)
        modes = sum(undb(mode_db) * fade(mode_t60) * np.sin(2 * np.pi * hz * HIT) * rng.choice([-1, 1])
                    for hz, mode_t60, mode_db in REEL_MODES)
        add(out, s, level(crack, db, window_s=.002) + level(modes, db + ring_db, window_s=.002))
    tail = colour(noise(side_db=-2, size=len(HIT)) * fade(hull_t60), HULL_RING_COLOUR)
    tail /= np.sqrt(np.sum(tail ** 2) / 2)
    return out + undb(hull_db) * signal.fftconvolve(out, tail, axes=1)[:, :N]


# Water gulping under the hull. Each row: start in seconds, length in seconds, level in dB before the swell,
# start pitch in Hz, end pitch in Hz.
WATER_LAPS = [(1.257, .075, -54, 222, 327), (2.219, 0.082, -51.5, 367, 314), (3.586, 0.18, -56, 336.3, 274),
              (4.062, 0.27, -54, 296.8, 286), (4.287, 0.14, -53.5, 293.6, 361),
              (4.52, 0.26, -53.5, 241, 401), (5.559, 0.079, -50, 269, 234), (7.246, 0.069, -55, 255, 283),
              (7.324, 0.055, -51, 303, 350), (7.414, 0.076, -55, 263.4, 251.6)]


def laps(width_hz=170):
    """Ripples close a pocket of air under the hull; its hollow resonance glides as it fills."""
    out = np.zeros(N)
    for s, length, db, start_hz, end_hz in WATER_LAPS:
        size = int(length * SR)
        gulp = narrow(np.linspace(start_hz, end_hz, size), width_hz)
        add(out, s, undb(db) * gulp * np.sin(np.linspace(0, np.pi, size)))
    return out


# Fits of winding. Each row: start in seconds, length in seconds, then in relative dB gears, whirr,
# line rubbing and sleeve, then snaps per second before bunching and crowding.
WINDING_FITS = [(1.469, 0.36, -57.5, -77.5, -68.5, -54.5, 30), (1.841, 0.29, -56, -75, -63.5, -54.5, 60),
                (2.1, 0.36, -59, -62, -64.5, -58.5, 45), (2.405, 0.32, -52.5, -63, -70, -56.5, 45),
                (2.77, 0.36, -52.5, -60.5, -69, -57, 45), (3.154, 0.21, -51, -60.5, -76, -54, 30),
                (3.388, 0.19, -53, -58, -62.5, -55, 35), (3.536, 0.38, -53, -73, -69, -68, 22),
                (3.955, 0.42, -53.5, -59, -67, -59, 22), (4.447, 0.3, -60.5, -81, -71, -62.5, 10),
                (4.764, 0.19, -56, -78, -61, -58.5, 120), (5.014, 0.29, -66, -69, -70, -59.5, 8),
                (5.286, 0.38, -62, -67.5, -68, -55, 4), (5.748, 0.34, -63, -73, -71.5, -61, 1),
                (6.484, 0.29, -64, -65, -67.5, -65, 3), (6.952, 0.33, -73, -69, -68.5, -57, 4),
                (7.237, 0.23, -52.5, -68, -69.5, -57, 40), (7.472, 0.28, -56.5, -63.5, -71, -58, 8),
                (7.938, 0.69, -60.5, -70, -73.5, -62, 1)]
# Between fits the hands barely stir. One row: the last five columns above.
WINDING_REST = (-76, -88, -73, -64, 1)
GEARS, WHIRRING, RUBBING, CLOTH, SNAPS = range(5)  # those columns
FIT_ATTACK_S, FIT_RELEASE_S = 0.02, 0.076


def winding(column):
    """One quantity of the fits over time: each rises, holds and dies away to rest; still before the first."""
    size = float if column == SNAPS else undb
    out = size(WINDING_REST[column]) * np.clip((TIME - WINDING_FITS[0][0]) / FIT_ATTACK_S, 0, 1)
    for start, length, *strengths in WINDING_FITS:
        attack = np.clip((TIME - start) / FIT_ATTACK_S, 0, 1)
        release = np.exp(-np.maximum(TIME - start - length, 0) / FIT_RELEASE_S)
        out = np.maximum(out, size(strengths[column]) * attack * release)
    return out


# Close resonances of the reel body that the gears excite. Each row: frequency in Hz, width in Hz, relative dB.
WHIRR_MODES = [(1845, 55, 0), (1918, 56, 4), (1988, 25, -1.5)]
# Mesh hiss. Each row: frequency in Hz, relative level in dB.
MESH_COLOUR = [(500, -34.5), (1100, 6), (1450, 3), (2200, 6), (2700, 3), (3100, -2), (3900, -6),
               (5500, -20), (7700, -6), (8500, -25), (12000, -18.5), (14000, -66)]
# Hard pushes of the handle that make the whirr swell. Each row: start in seconds, length in seconds,
# relative level in dB.
HANDLE_PUSHES = [(2.1, 0.17, -63), (2.37, 0.13, -56), (2.8, 0.16, -59), (2.998, 0.15, -64),
                 (3.53, 0.35, -54.5), (4.11, 0.45, -59.5), (4.997, 0.31, -64), (5.865, 0.38, -59.5),
                 (6.951, 0.38, -63.5), (7.577, 0.13, -57)]


def gears(whirr_db=2.0, mesh_db=-3.0, rough_db=3.5, waver_db=-1.5, scrub_db=1.0, drift=0.014,
          tooth_rate=900, skirt_hz=450):
    """Teeth catch unevenly and ring wavering resonances of the reel body, over a faint mesh hiss."""
    teeth = grains(tooth_rate, spread_db=2.5, side_db=-20.5)
    modes = sum(undb(db) * ring(teeth, hz, width) for hz, width, db in WHIRR_MODES)
    body = ring(modes, WHIRR_MODES[1][0], skirt_hz)
    bent = np.cumsum(1 + drift * walk(14))  # uneven reading position bends the pitch
    whirr = np.array([np.interp(bent, np.arange(N), side) for side in body])
    whirr = whirr * undb(scrub_db * walk(130))
    mesh = colour(noise(side_db=-5.5) * undb(rough_db * walk(110)), MESH_COLOUR)
    pushes = sum(undb(db) * np.sqrt(arch(s, length)) for s, length, db in HANDLE_PUSHES)
    load = np.hypot(winding(WHIRRING) * undb(waver_db * walk(4.5)), pushes)
    return undb(whirr_db) * unit(whirr) * load + undb(mesh_db) * unit(mesh) * winding(GEARS)


# Sticking line. Each row: frequency in Hz, relative level in dB.
FRICTION_COLOUR = [(800, 4), (2400, 1), (3300, 2), (4200, 1), (6000, 1), (7700, -19), (8600, -2),
                   (10500, -17), (12200, -10), (13500, -16), (16000, -29)]
# Line gliding lightly through the guides. Each row: frequency in Hz, relative density in dB per Hz.
WHISPER_COLOUR = [(2000, -24), (3600, -3.5), (5000, 4), (7700, -9), (8700, -12), (12000, -26), (16000, -42)]


def rub(grain_rate=600, spread_db=2.5, grain_db=-3, hiss_db=-5.5, grip_db=1.5, firm_db=-60,
        stick_power=1.11, glide_db=-67, glide_power=0.48):
    """Wet line glides in a whisper; pressed firmer, it sticks and slips more, in tiny uneven grains."""
    pressure = winding(RUBBING) / undb(firm_db) * undb(grip_db * walk(5.2))
    slips = undb(grain_db) * grains(grain_rate, spread_db, side_db=-1.0)
    friction = colour(slips + undb(hiss_db) * noise(side_db=-8.0), FRICTION_COLOUR)
    stick = undb(firm_db) * unit(friction) * pressure ** stick_power
    glide = undb(glide_db) * unit(colour(noise(side_db=-14), WHISPER_COLOUR)) * pressure ** glide_power
    return stick + glide


def crackle(level_db=-3.5, spread_db=10, sharpness=1.8, bunching_db=3, crowding=2.7):
    """Faint snaps in bunches, each with its own pitch; they grow with the rubbing."""
    out, size = np.zeros((2, N)), 512
    rate = crowding * winding(SNAPS) * undb(bunching_db * walk(18))
    effort = winding(RUBBING)
    snaps = np.flatnonzero(rng.random(N) < rate / SR)
    for i, (pitch, weakness) in zip(snaps, rng.random((len(snaps), 2))):
        hz = 2000 * 4.2 ** pitch
        push = noise(side_db=-6.5, size=size) * fade(0.0042)[:size]
        snap = colour(ring(ring(push, hz, hz / sharpness), hz, hz * 2), PORT_COLOUR)
        add(out, i / SR, np.sqrt(effort[i]) * peak(snap, level_db - spread_db * np.sqrt(weakness)))
    return out


# A wet line sliding through the fingers. Each row: start in seconds, length in seconds, relative level in dB.
LINE_SLIDES = [(1.705, 0.074, -52.5), (1.92, 0.085, -52), (4.65, 0.067, -58.5), (4.824, 0.028, -45.5),
               (6.044, 0.14, -56), (6.635, 0.14, -60), (7.95, 0.16, -64)]
# Its colour. Each row: frequency in Hz, relative level in dB.
LINE_SLIDE_COLOUR = [(600, 3.5), (2500, 5.5), (4200, 3.5), (6000, 0.5), (7700, -0.5), (9000, -7.5),
                     (12000, -13), (13500, -19), (16000, -30)]


def slides(catch_db=1.0):
    """Wet line slides through the fingers in short, grainy swishes."""
    out = np.zeros((2, N))
    hiss = unit(colour(noise(side_db=-11) * undb(catch_db * walk(340)), LINE_SLIDE_COLOUR))
    for s, length, db in LINE_SLIDES:
        out += undb(db) * hiss * arch(s, length)
    return out


# A short squeak of the grip. One row: start in seconds, relative peak in dB, pitch in Hz, t60 in seconds.
GRIP_SQUEAK = (8.525, -42, 4050, 1.5)


def squeak(width_hz=200, rise_s=.0012):
    """A wet finger skids on the grip and sings for a moment."""
    out = np.zeros(N)
    s, db, hz, t60 = GRIP_SQUEAK
    song = narrow(np.full(len(HIT), hz), width_hz)
    add(out, s, peak(song * fade(t60) * (1 - np.exp(-HIT / rise_s)), db))
    return out


def boat(x, echo_db=-19, t60=0.14):
    """Faint, short reflections from the body, seats and hull."""
    tail = noise(side_db=-18, size=len(HIT)) * fade(t60) * (HIT > .002)
    tail = colour(tail, [(300, -16), (2500, 2.5), (8000, -4.5), (14000, 1.0)])
    tail *= undb(echo_db) / np.sqrt(np.sum(tail ** 2) / 2)
    return x + signal.fftconvolve(x, tail, axes=1)[:, :N]


# Lag of the reel's sound at the left port. Each row: frequency in Hz, phase in radians.
LEFT_PORT_LAG = [(100, 0.036), (1200, 0.76), (2500, 0.38), (3700, 1), (4600, 0.32), (7500, 0.31),
                 (9000, 0.36), (12000, 1)]


def ports(x, right_db=.5):
    """The reel is a little to the right: its sound bends round the camera to the left port, later and weaker."""
    lag = np.interp(np.linspace(0, SR / 2, N // 2 + 1), *np.transpose(LEFT_PORT_LAG))
    left = irfft(rfft(x[0]) * np.exp(-1j * lag), N)
    return np.array([left * undb(-right_db), x[1] * undb(right_db)])


def scene(sleeve_left_db=1.5):
    """Reel in front, winding arm on the left, hull and lake all round."""
    echoing = boat(bail() + ticks() + crackle())
    reel = ports(echoing + cast() + gears() + rub() + slides() + squeak())
    arm = (sleeve() + knocks()) * undb(sleeve_left_db * LEFT_RIGHT)
    return reel + arm + hull() + laps() + background()


TOP_HZ = 16200


def record(dry):
    """The camera cuts the deepest rumble and the top."""
    dry = signal.sosfilt(signal.butter(2, 18, "high", fs=SR, output="sos"), dry)
    return signal.sosfilt(signal.ellip(8, .2, 70, TOP_HZ, fs=SR, output="sos"), dry)


dry = scene()
out = record(dry)
inscribe(out)
```